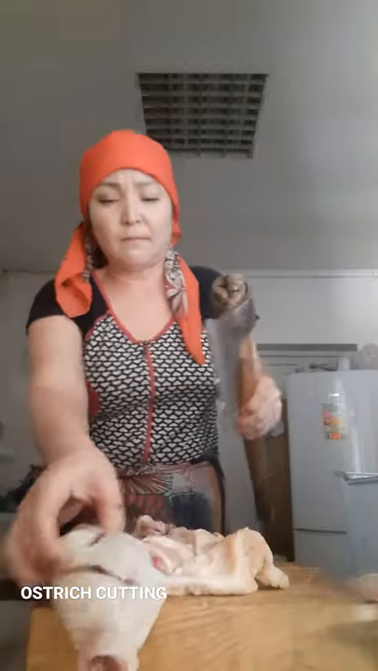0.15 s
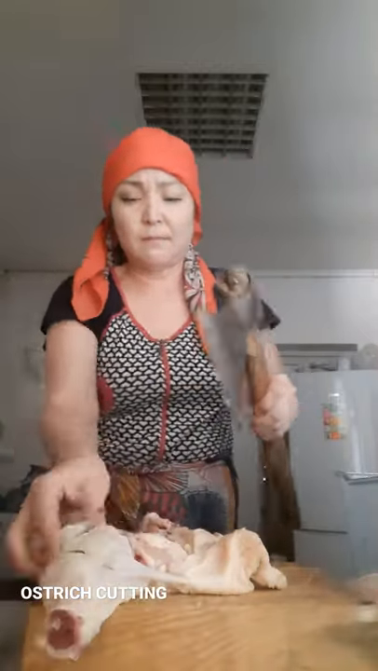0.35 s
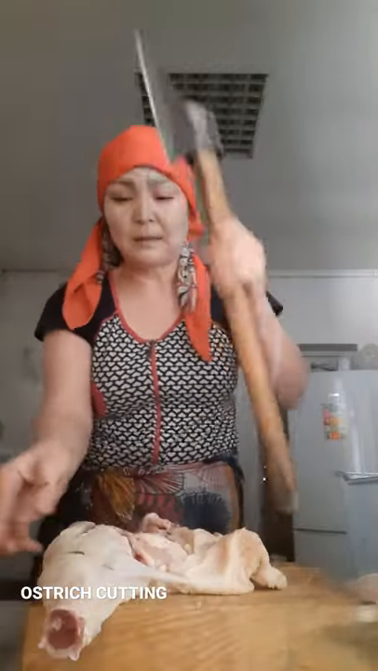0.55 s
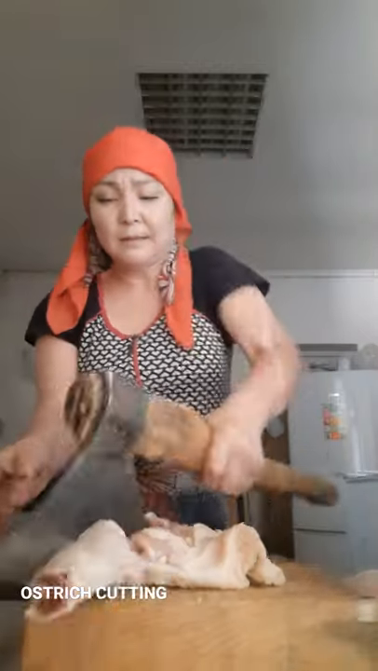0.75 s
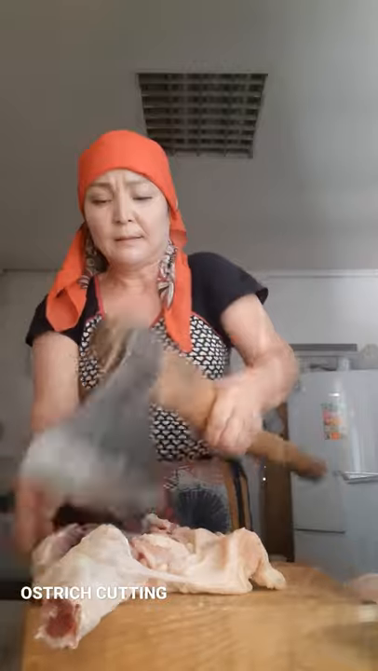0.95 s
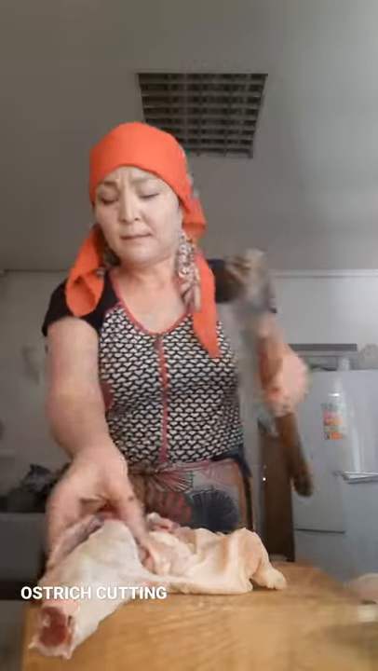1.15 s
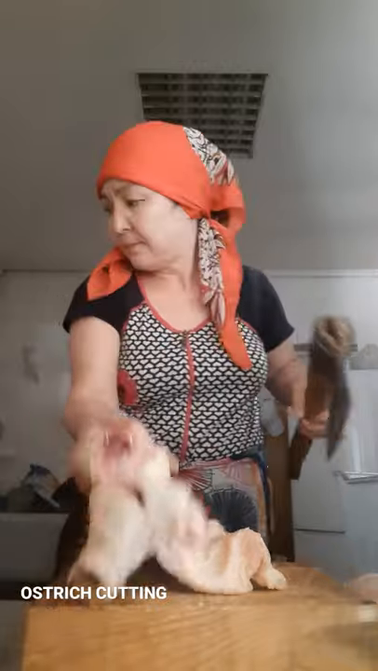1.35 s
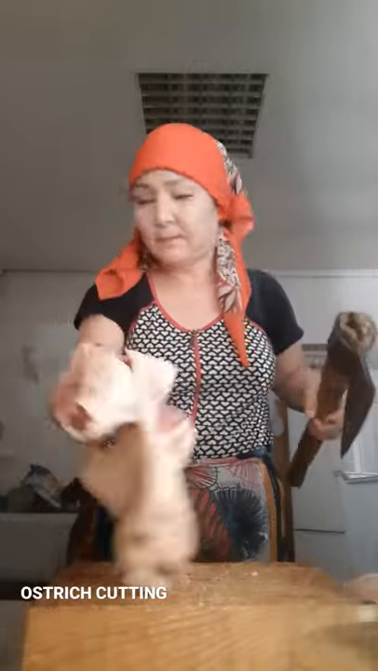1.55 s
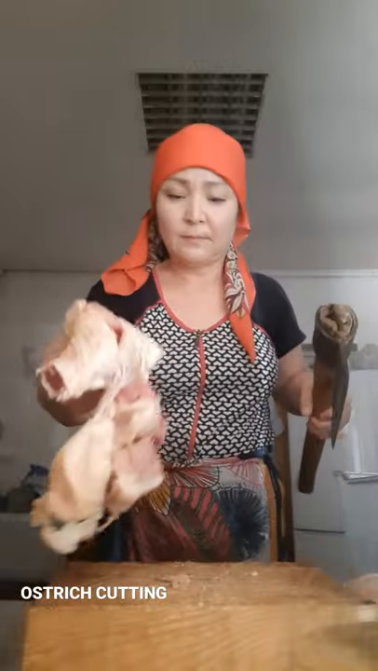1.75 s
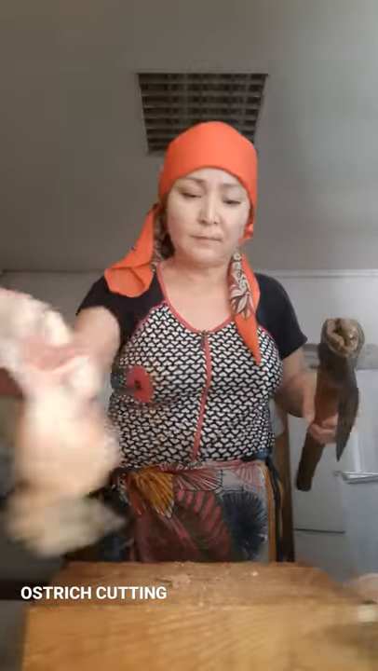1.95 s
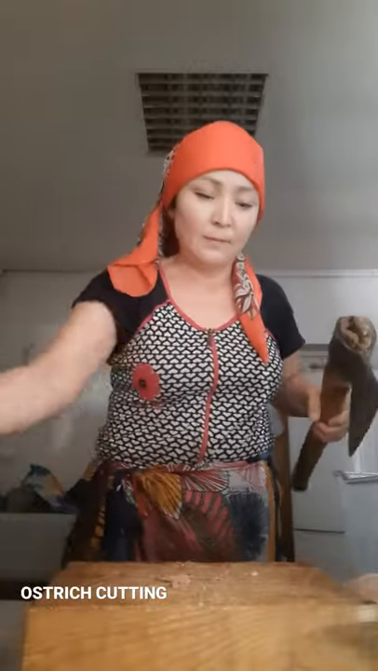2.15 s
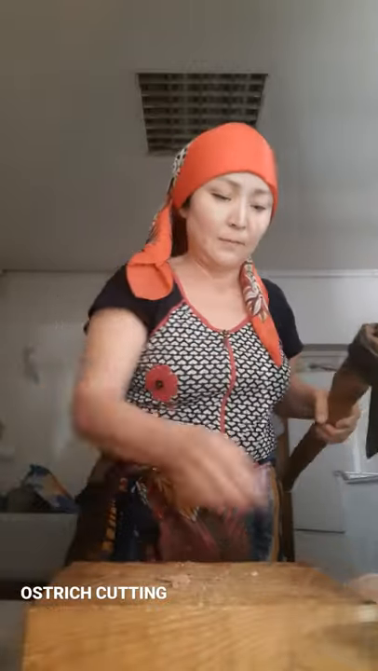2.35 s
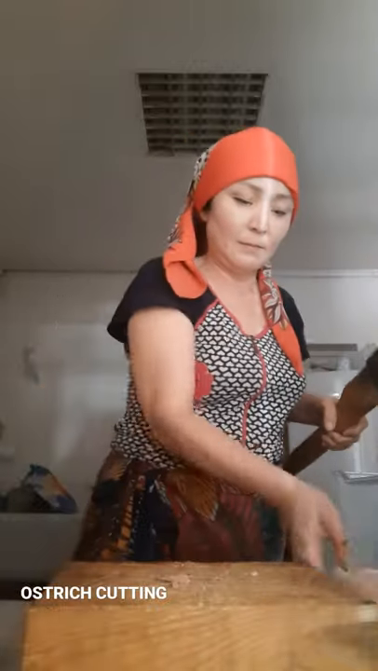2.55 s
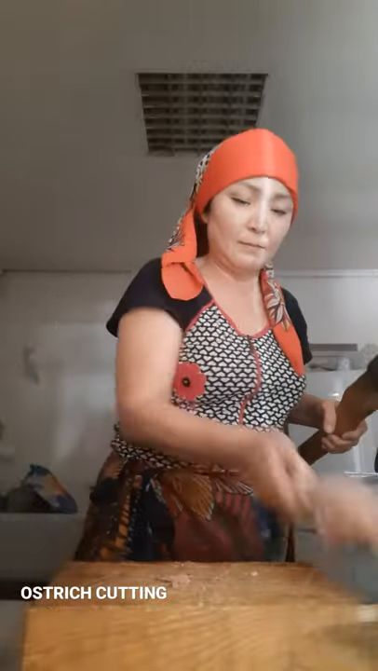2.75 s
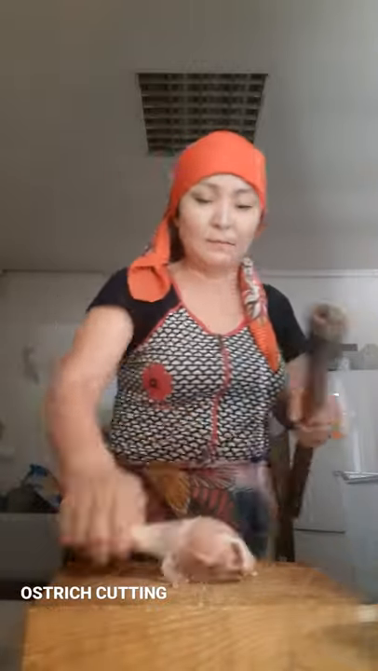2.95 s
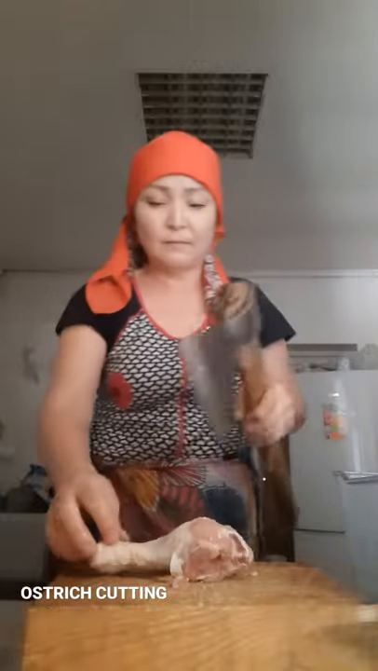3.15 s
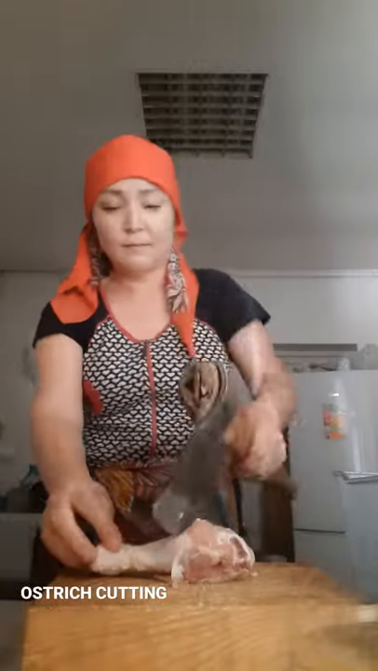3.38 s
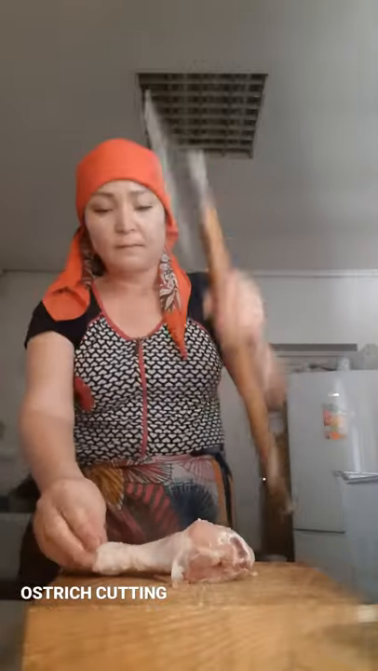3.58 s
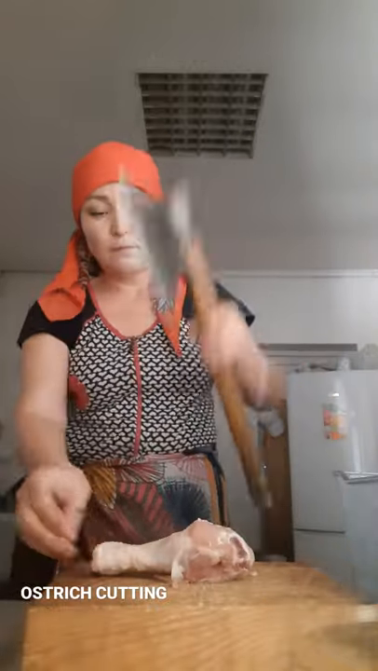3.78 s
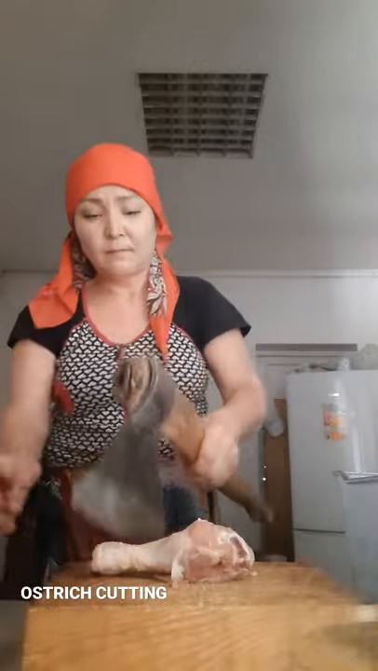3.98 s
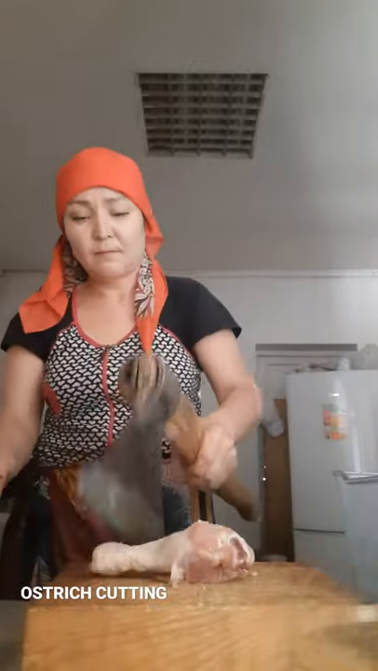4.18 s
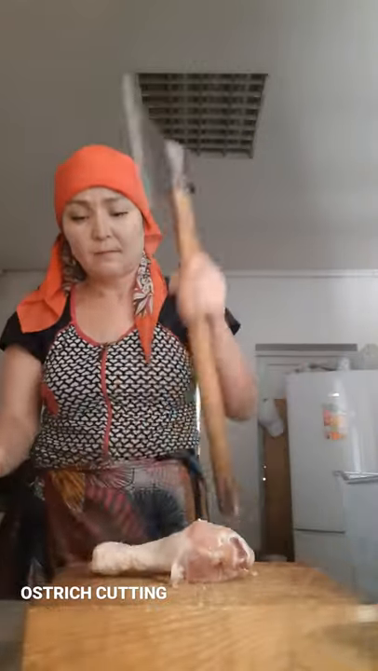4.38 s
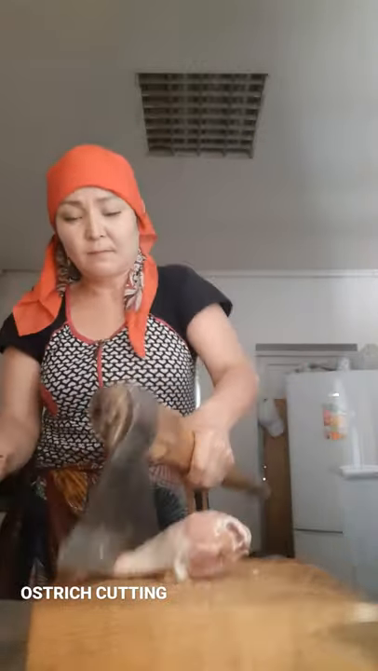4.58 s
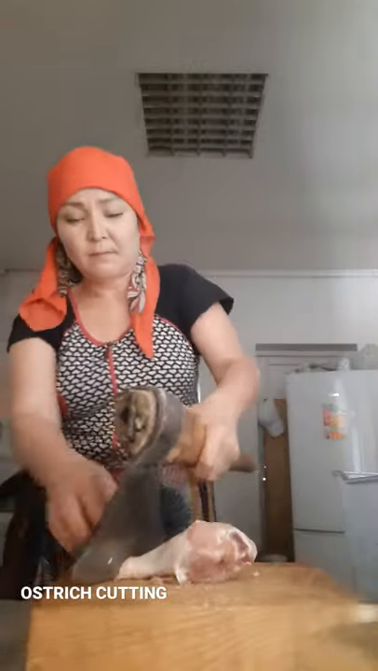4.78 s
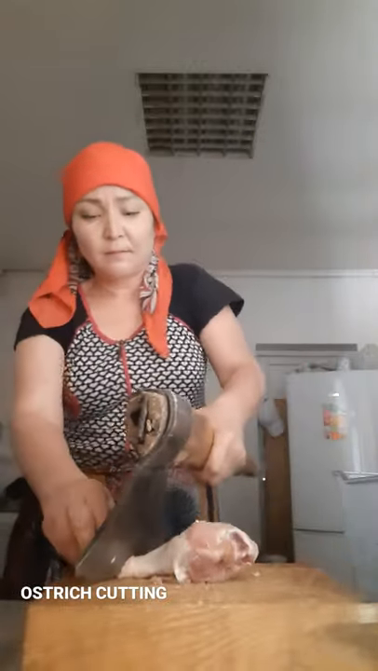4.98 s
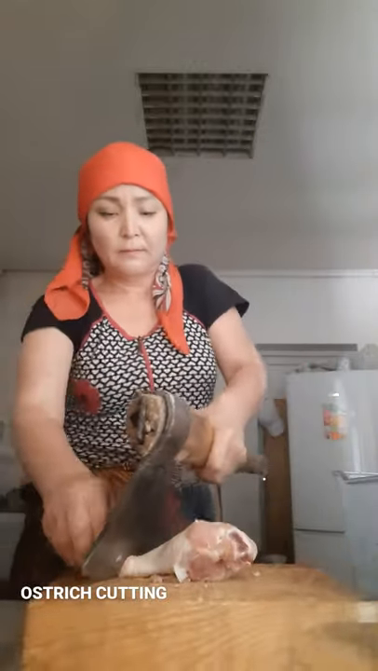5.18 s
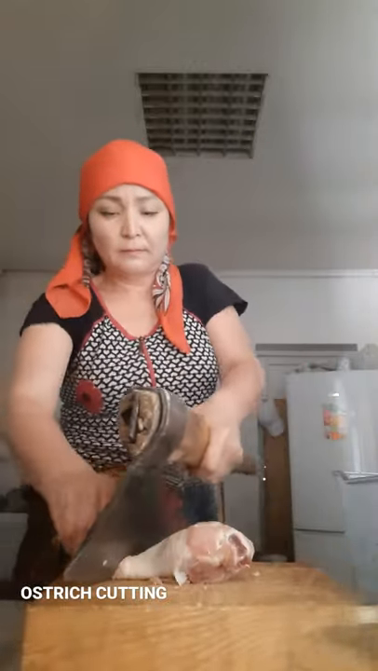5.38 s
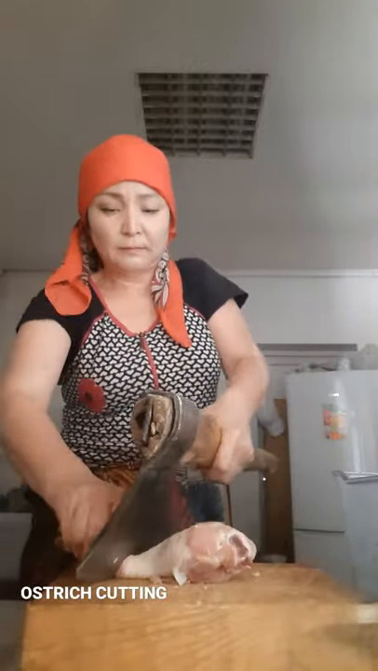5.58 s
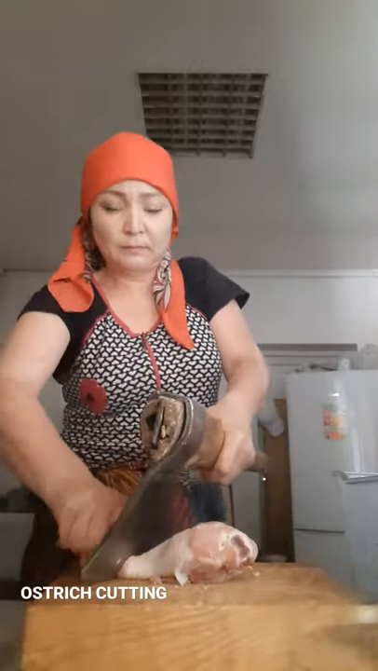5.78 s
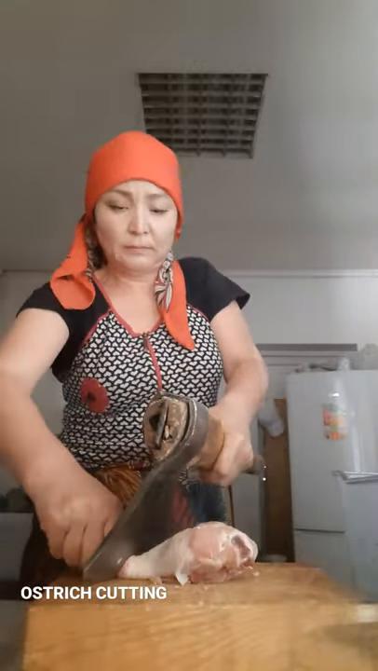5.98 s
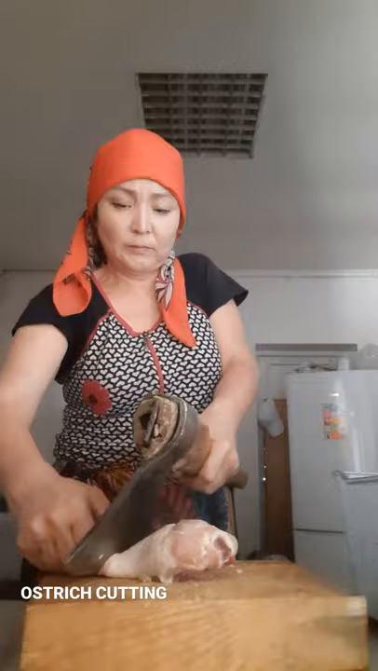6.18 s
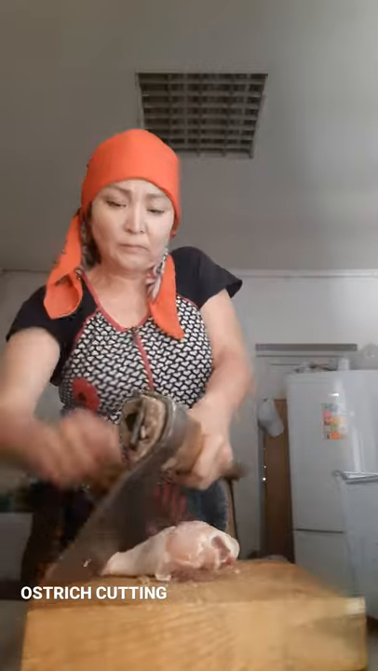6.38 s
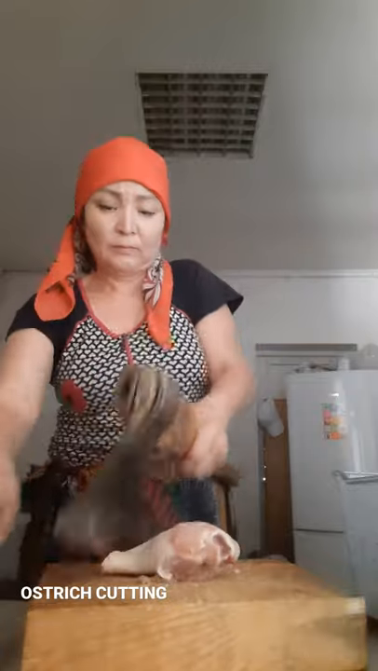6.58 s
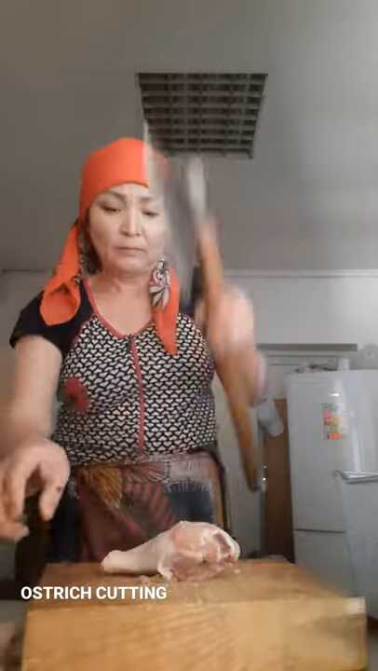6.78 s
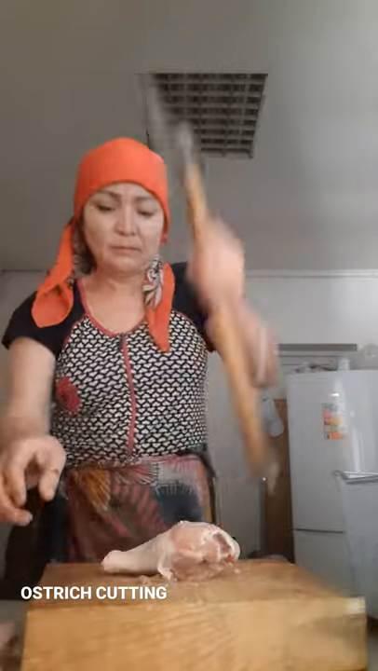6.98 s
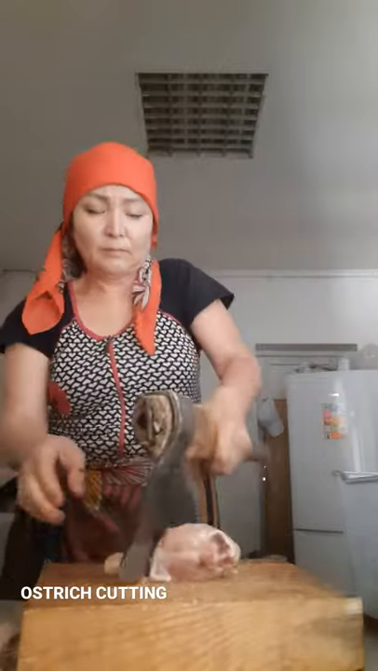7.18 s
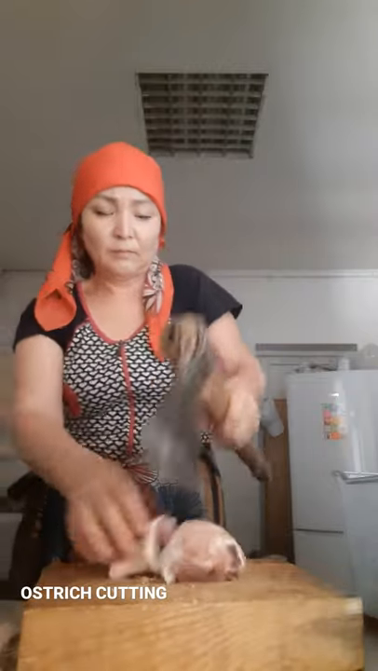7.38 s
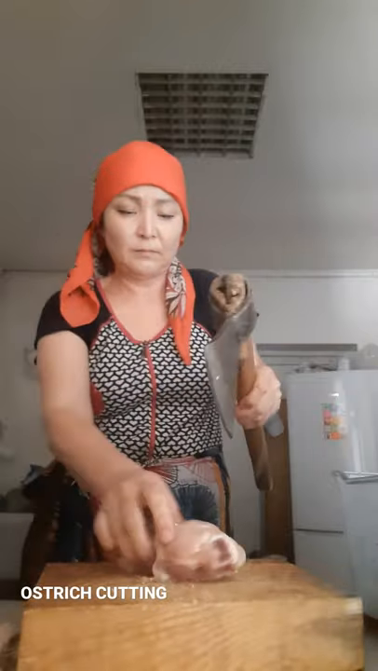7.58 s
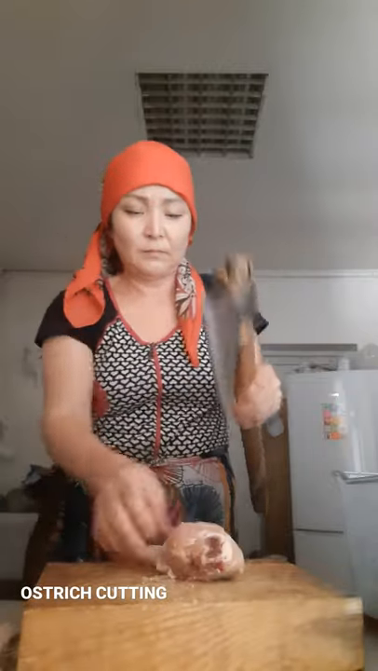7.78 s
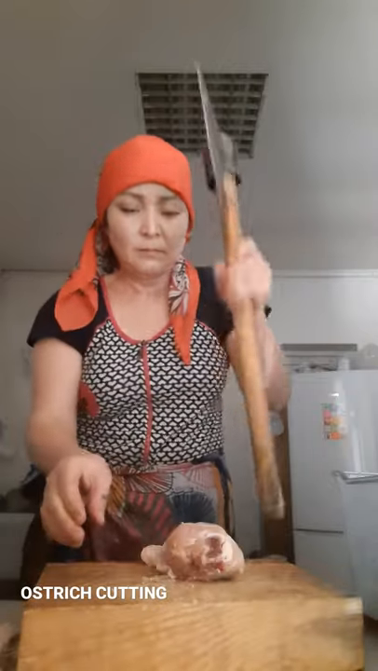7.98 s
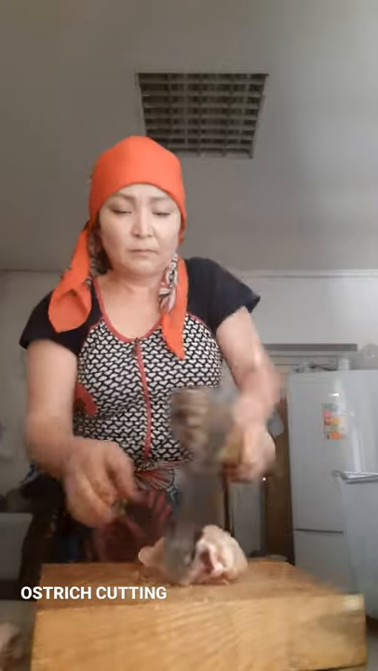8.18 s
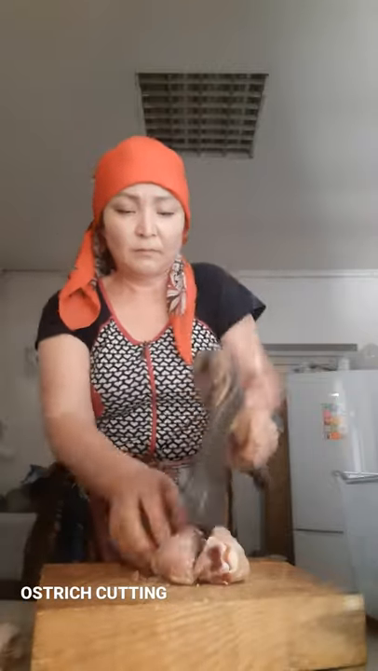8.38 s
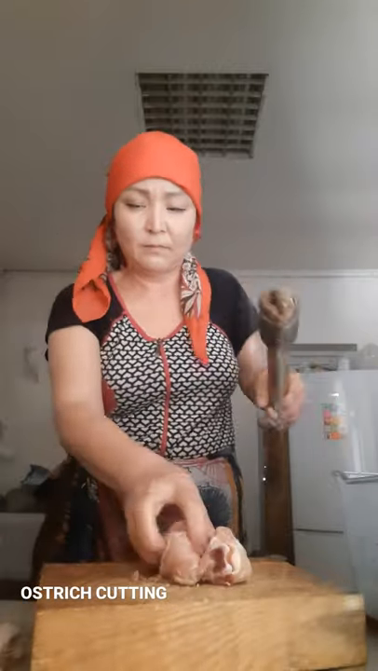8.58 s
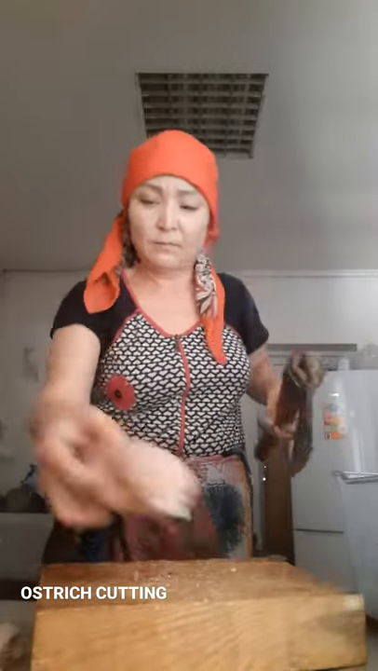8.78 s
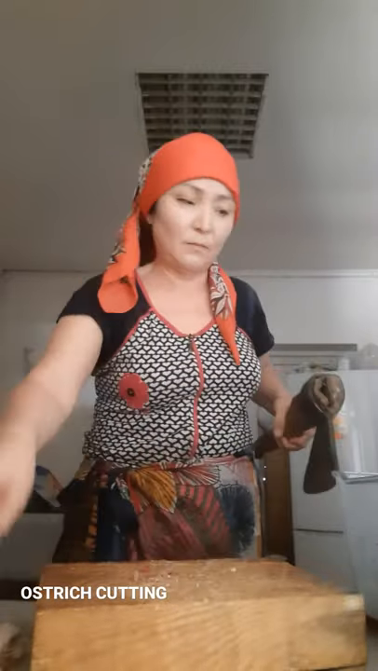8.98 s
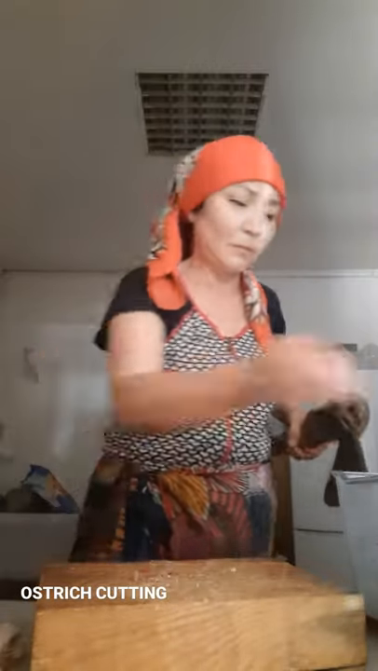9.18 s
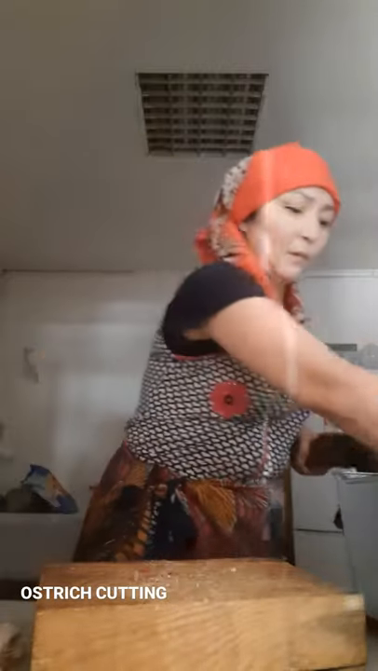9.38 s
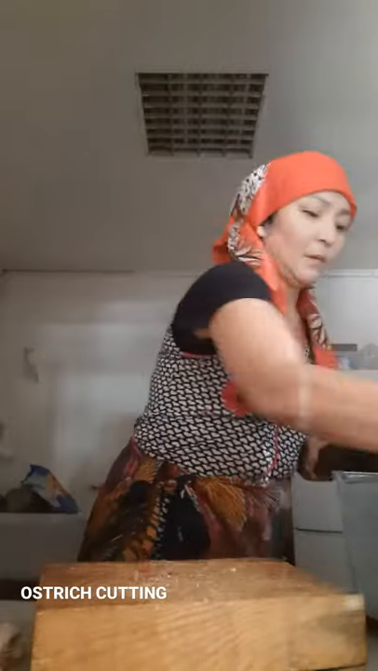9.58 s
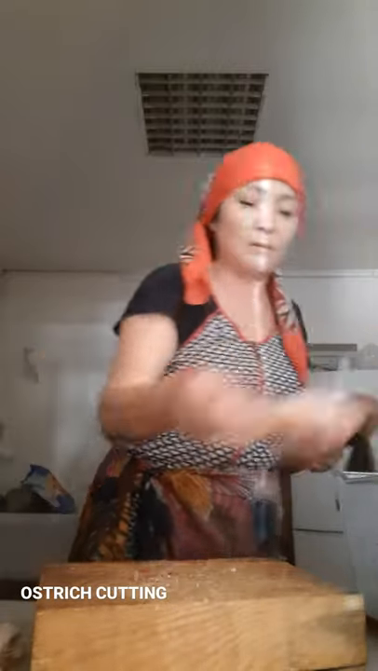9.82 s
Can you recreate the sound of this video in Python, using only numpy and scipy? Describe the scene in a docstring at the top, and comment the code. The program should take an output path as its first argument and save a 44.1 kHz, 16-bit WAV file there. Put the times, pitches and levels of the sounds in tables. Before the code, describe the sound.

Close in a hard-walled kitchen, a heavy blade cracks through bone into a thick wooden block. Meat is dragged and dropped aside, a fresh piece slaps down, and a second blow follows after a long gap. The stuck blade creaks and bone snaps as it is pulled free. Two more chops come about a second apart, each with a wooden boom and short echo. Ventilation hums softly; tiny distant squeaks appear.

```python
"""Cleaver on a chopping block

A heavy cleaver chops raw meat and bone on a thick wooden block in a hard-walled kitchen.
Each of four blows sums a noisy bone crack, a thud pulse, decaying block modes and a rock-back knock.
In between, filtered pulses and grains make meat slaps, drags, snaps and plops; a stuck blade creaks.
Gliding sines squeak faintly from afar over filtered ventilation noise; shaped noise is the reverb."""
import sys
import numpy as np
from scipy import signal
from scipy.fft import rfft, irfft, next_fast_len
from scipy.io import wavfile
from scipy.ndimage import uniform_filter1d

SR = 44100
rng = np.random.default_rng(int(sys.argv[2]) if len(sys.argv) > 2 else 0)


def log_audio(samples):
    """Write samples as a 16-bit WAV file to the path given in sys.argv[1]."""
    # one column per channel
    frames = np.atleast_2d(samples).T
    # limit to full scale, then quantise
    limited = np.clip(frames, -1, 1)
    pcm = np.round(limited * 32767).astype(np.int16)
    wavfile.write(sys.argv[1], SR, pcm)


N = 434385

# background levels: t/s, body level/dB, treble level/dB, gain of the whistling resonances/dB
BACKGROUND_LEVELS = [(0, -57.5, -64.5, -5.5), (.7, -60, -65, -3), (1.5, -59.5, -60, 0.5),
                     (1.7, -61, -64.5, 1.5), (2.9, -58.5, -59.5, 1), (4.4, -58, -62, 3.5),
                     (5.6, -56.5, -59.5, -4.5), (7.0, -59, -59.5, 2.5), (8.3, -60, -60, 0),
                     (9.05, -61, -59.5, 4.5), (9.3, -58, -77, -8), (9.85, -56.5, -66.5, -13.5)]
# ventilation noise spectrum: f/Hz, density/dB per Hz
AIR_SPECTRUM = [(15, -48.5), (25, -24), (49, -1.5), (120, -6.5), (242, -17.5), (344, -4), (384, -6),
                (695, -13.5), (796, -11), (1400, -11.5), (1610, -14), (2350, -10), (4740, -19.5),
                (12200, -20.5), (16000, -32)]
# ventilation resonances: f/Hz, width/Hz, level against the noise of its band/dB
VENT_RESONANCES = [(291.8, 4, -9.5), (346, 11, -13), (388, 70, -23), (652, 18, -14), (1297, 18, -8.5),
                   (1401, 22, -3), (1520, 70, -7), (2270, 55, -11.5), (3950, 130, -11.5)]
WHISTLE_ABOVE_HZ = 1000

# distant squeaks: t/s, length/s, start f/Hz, end f/Hz, arch/share of f, waver/share of f,
# level/dB, first overtone/dB (the second is half the first)
SQUEAKS = [(0.22, 0.2, 1285, 1263, 0.015, 0.0038, -62, -20),
           (0.39, 0.16, 2400, 2280, 0.004, 0.014, -65, -17), (1.175, 0.038, 2300, 2405, 0, 0.037, -56, -9),
           (1.3, 0.083, 1760, 1650, -0.034, 0.036, -63, -20),
           (2.879, 0.046, 3450, 3750, -0.015, .02, -58, -18),
           (3.09, 0.081, 3490, 3980, 0.028, 0.015, -47, -10),
           (3.28, 0.054, 3950, 3710, 0.0047, 0.028, -51, -12),
           (5.969, 0.031, 2816, 2870, 0, 0.014, -53.5, -20),
           (6.081, 0.046, 3230, 3300, -0.02, 0.022, -54, -20),
           (6.503, 0.086, 3760, 3950, 0.0034, 0.014, -50, -20),
           (8.35, 0.17, 2425, 2366, 0.0071, 0.0073, -58.5, -20),
           (8.792, 0.08, 2684, 2405, 0.016, 0.053, -49.5, -18),
           (9.064, 0.069, 3180, 3270, -0.016, 0.025, -52.5, -23),
           (9.112, 0.1, 2693, 2450, 0, 0.061, -48.5, -23),
           (9.368, 0.057, 3000, 3180, 0.013, 0.039, -47, -19),
           (9.44, 0.051, 2600, 2425, -0.0046, 0.058, -42, -15),
           (9.447, 0.028, 4300, 4560, 0.094, 0.03, -49, -20),
           (9.466, 0.026, 4650, 3570, -0.019, 0.025, -42.5, -10),
           (9.499, 0.05, 2450, 2926, 0.065, 0.066, -46, -12),
           (9.684, 0.036, 3100, 2625, -0.0099, 0.095, -43, -13.5),
           (9.717, 0.03, 4000, 4240, 0.032, 0.032, -44.5, -9.5),
           (9.737, 0.018, 4200, 2490, -0.11, 0.067, -43, -11.5),
           (9.756, 0.038, 2650, 2436, -0.018, 0.072, -46.5, -12),
           (9.78, 0.024, 1350, 1530, 0.032, .03, -54, -15)]
RASP_PER_WAVER, RASP_HZ = 4.1, 900   # unsteady squeaks also rasp more

# meat gripped, dragged or peeled off the wood: t/s, length/s, squelch level/dB, rumble level/dB,
# rub level/dB, sticky crackle level/dB
HANDLING = [(0, 0.062, -80, -53.5, -63, -80), (0.118, 0.18, -59.5, -57.5, -72, -57.5),
            (0.276, 0.14, -60.5, -67, -78, -65), (1.368, 0.11, -80, -83, -78, -61),
            (1.573, 0.19, -61.5, -61.5, -68, -76), (1.705, 0.64, -61, -58, -59, -71),
            (2.084, 0.24, -57.5, -53, -68, -49), (2.434, 0.23, -56, -55, -54.5, -58),
            (2.64, 0.087, -60, -62, -53, -68), (2.68, 0.17, -61, -69, -59.5, -58.5),
            (2.76, 0.17, -73, -48, -65, -78), (2.957, 0.29, -56, -56, -65, -66),
            (3.257, 0.17, -72, -48.5, -51, -58), (3.395, 0.45, -78, -61.5, -57, -78),
            (4.185, 0.17, -62, -75, -66, -80), (5.172, 0.093, -57, -60, -54, -74.5),
            (5.241, 0.18, -56.5, -60, -52.5, -75), (5.449, 0.092, -55, -58, -48, -73),
            (5.561, 0.066, -60, -52, -61, -48), (5.9, 0.42, -57, -85, -82, -62),
            (6.258, 0.15, -45, -53, -43, -54), (6.548, 0.19, -52.5, -55, -65, -53.5),
            (8.213, 0.39, -60, -70, -55, -66.5), (8.54, 0.3, -62.5, -83, -67, -67),
            (8.989, 0.11, -64, -50, -55, -56), (9.383, 0.097, -51.5, -47.5, -44.5, -69)]
STROKE_PEAK = 0.55   # share of a stroke spent swelling

# bone splinters and gristle snaps: t/s, level/dB, f/Hz, ring against the snap/dB
SNAPS = [(2.151, -26, 5600, -16), (2.225, -26, 4070, 1), (2.548, -23.5, 12900, -5),
         (5.576, -5.5, 1660, -9.5), (5.582, -10, 2030, -3.5), (5.591, -22, 900, -19),
         (5.693, -38.5, 6900, 13.5), (6.033, -24.5, 6230, -6), (6.612, -21, 2550, -10),
         (9.544, -27.5, 12300, -1), (9.832, -45, 12800, -6)]
# slips of the stuck blade in the bone
CREAK_S, CREAK_GAP_S, CREAK_DB, CREAK_HZ, CREAK_RING_DB = 5.274, 0.016, -39, 2000, 12.5

# meat pieces landing aside: t/s, plop level/dB, wet smack level/dB, hollow f/Hz, hollow ring level/dB
DROPS = [(2.593, -14, -8.5, 407, -9.5), (2.792, -29, -30, 293, -17.5), (3.693, -32, -44, 330, -15),
         (4.08, -30.5, -46, 393, -19.5), (9.406, 1.5, -26, 438, -15), (9.536, -30, -27, 403, -22)]

# meat and blade bumping on the block: t/s, thump level/dB, wet smack level/dB
BUMPS = [(2.19, -29, -26), (2.262, -25, -41), (2.955, -2.5, -9), (2.989, -16, -22), (3.113, -10, -47),
         (3.296, -16, -25), (3.325, -18.5, -30), (3.429, -16, -27), (4.046, -17, -59), (4.838, -17.5, -48),
         (5.235, -19.5, -44), (5.467, -14.5, -34), (5.579, -19, -15), (6.347, -7, -8),
         (6.647, -21.5, -18.5), (7.324, -14.5, -34), (8.421, -24, -35), (9.019, -24.5, -25.5),
         (9.408, -15, -24)]
BUMP_HZ, BUMP_DB_PER_OCTAVE = 560, 26   # hardness of a 0 dB bump, and the level change that doubles it
STAND_HZ = 102.5   # sway of the stand under a bump

# block landing after it tipped: t/s, level/dB, length/s, hardness f/Hz, first touch level/dB,
# dull tail level/dB, block ring level/dB
ROCKS = [(0.867, -1, 0.029, 1130, -8.5, -18, -32), (4.676, 6, 0.013, 1247, -7.5, -14, -17),
         (7.179, 6.5, 0.012, 2640, -1, -9, -22.5), (8.191, 5.5, 0.02, 1780, -6, -10, -21.5)]
TOUCH_BEFORE_S, TOUCH_S, TOUCH_HZ = 0.072, 0.0078, 710   # dull first touch
DULL_TAIL_AFTER_S, DULL_TAIL_S, DULL_TAIL_HZ = 0.073, 0.23, 1370   # noise following the landing
DULL_TAIL_FLUTTER_DB, DULL_TAIL_FLUTTER_PER_S = 2.5, 32.1
LANDING_TICK_DB, LANDING_TICK_S = -2, 0.0011   # block edge strike; level against the knock
# block response to a landing: f/Hz, gain/dB
LANDING_ANSWER = [(100, -16.5), (135, -9.5), (160, -8), (295, -4.5), (335, 6), (400, 4), (490, -2),
                  (800, -5)]

# blows: t/s, crack level/dB, crack length/s, delay to the wood/s, thud level before THUD_GAIN_DB/dB,
# hardness f/Hz, bone f/Hz, bone ring against the crack/dB, sway/dB, boom/dB, block ring/dB
CHOPS = [(0.756, 13, 0.0085, 0.0084, 14, 1524, 2710, -3.5, -13, -21.5, -15),
         (4.5766, 14, 0.0075, 0.0043, 13.5, 2497, 959, -2, -9, -12, -9),
         (7.0712, 11.5, 0.0062, .0043, 16.5, 1646, 1010, 2, -13.5, -9.5, -20.5),
         (8.0998, 9, 0.0075, 0.0077, 11.5, 802, 856, -10.5, -11.5, -10, -21)]
THUD_GAIN_DB = 3.0
SWAY_HZ, BOOM_HZ, RING_HZ = 100, 146, 290   # where the last three columns of CHOPS apply
# stand bottoming out under a blow: t/s, level/dB, hardness f/Hz
JOLTS = [(0.782, 7, 420), (4.602, 9, 330), (7.121, 7, 520), (8.135, 8, 260)]
# modes of block and stand: nominal f/Hz, level/dB, t60/s
BLOCK_MODES = [(66, -15.5, 0.053), (99, -1, 0.25), (124, -2.5, 0.24), (135.5, -1, 0.2), (157.7, 2, 0.28),
               (219.6, -9.5, 0.2), (301.3, 3.5, 0.19), (331.5, -3.5, 0.16), (399, -8.5, 0.12),
               (494, -6, 0.24), (652, -15, 0.27), (806, -20, 0.17)]
DETUNE = 0.02   # meat loads the block differently at every strike: mode spread, share of f
# thin high ringing after each blow: f/Hz, level/dB, t60/s
HIGH_RING_MODES = [(1588, -38.5, 0.42), (1970, -36.5, 0.41), (2144, -38, 0.42), (2450, -40.5, 0.57),
                   (2740, -45, 0.22), (3180, -41, .3), (6900, -45.5, 0.36)]

# blade edge on the wood: f/Hz, density/dB per Hz
THUD_SPECTRUM = [(25, -26), (45, -7.5), (65, -0.5), (110, -9), (220, -3.5), (380, -0.5), (600, -4),
                 (1050, -7.5), (1700, -4.5), (3000, -18.5), (7000, -16.5), (16000, -35)]
# splitting bone, also peeling skin: f/Hz, density/dB per Hz
CRACK_SPECTRUM = [(60, -10.5), (400, -2), (1400, -4), (2800, -1), (4500, -4.5), (6700, -3.5), (9500, -12.5),
                  (13500, -5.5), (16000, -15.5)]
# block landing on its stand: f/Hz, density/dB per Hz
KNOCK_SPECTRUM = [(40, -13), (150, -4), (400, -9), (800, -5.5), (1700, -9), (2700, -8), (4000, -11.5),
                  (7000, -11.5), (15000, -7.5)]
# weight of meat: f/Hz, density/dB per Hz
THUMP_SPECTRUM = [(25, -10.5), (70, 3.5), (150, 6.5), (230, -8.5), (400, -5.5), (800, -20), (2000, -13.5),
                  (16000, -29)]
# hollow container: f/Hz, density/dB per Hz
PLOP_SPECTRUM = [(40, -73), (150, 0.5), (250, -7.5), (380, 8.5), (550, -2), (750, 3), (1100, -21),
                 (1500, -16.5), (4000, -21), (16000, -87)]
# wet skin: f/Hz, density/dB per Hz
SMACK_SPECTRUM = [(100, -21), (600, -7.5), (1800, 1.5), (3500, 1.5), (6500, -2.5), (10000, -12.5),
                  (13000, -7), (16000, -21)]
# small break: f/Hz, density/dB per Hz
SNAP_SPECTRUM = [(150, -4), (700, -11), (1800, -4.5), (3500, -7), (6500, -8), (10000, -7.5), (13500, 0),
                 (16000, -11)]
# flesh sliding on wood: f/Hz, density/dB per Hz
RUB_SPECTRUM = [(100, -17), (350, 2), (800, -6.5), (1300, -9), (2200, -5), (4000, -21), (16000, -38)]
# block under shifting weight: f/Hz, density/dB per Hz
RUMBLE_SPECTRUM = [(20, -5), (55, 1), (130, -6), (220, -22), (350, -6), (700, -27), (2000, -43),
                   (16000, -61)]

# reverberation: f/Hz, gain before the standing waves/dB
ROOM_GAIN = [(30, 2.5), (70, -4.5), (170, -1.5), (350, 3), (700, 0), (1400, -7.5), (2800, -5.5),
             (6000, -10.5), (10000, -8.5), (15000, -7.5)]
# decay: f/Hz, t60/s
ROOM_T60 = [(60, 0.33), (250, 0.32), (700, 0.34), (1500, 0.46), (3000, 0.26), (7000, 0.34), (14000, 0.06)]
# left-right correlation of diffuse sound: f/Hz, correlation/1
LIKENESS = [(30, 0.98), (180, 0.94), (350, .93), (700, .6), (1400, -0.35), (3000, 0.32), (16000, -0.49)]
# standing waves between the walls: f/Hz, width/Hz, gain/dB
STANDING_WAVES = [(298, 20, 5), (483, 25, 4), (657, 33, 4.5), (840, 22, 1), (1010, 66, 4), (1590, 190, 1.5)]
DIP_DB, DIP_WAIT_S, DIP_FALL_S, DIP_HOLD_S, DIP_RETURN_S = -7.5, 0.095, 0.25, 0.46, 0.32

# colour of the two microphone ports: f/Hz, left minus right/dB
PORTS = [(250, -0.5), (700, -1.5), (1400, 0.5), (2800, 2), (5600, -3), (9500, 3), (13000, 0), (16000, -12)]
MIC_LAG_S, CUTOFF_HZ = 0.0001, 16300


def from_db(db):
    """Decibels to gain."""
    return 10 ** (np.asarray(db) / 20)


def rms_one(x):
    """Scale to unit power."""
    return x / np.sqrt(np.mean(x ** 2) + 1e-20)


def energy_one(x):
    """Scale to unit energy."""
    return x / np.sqrt(np.sum(x ** 2) + 1e-20)


def in_time(rows):
    """Interpolate the columns of a time table at every sample."""
    time_s, *columns = np.transpose(rows)
    return [np.interp(np.arange(N) / SR, time_s, column) for column in columns]


def at_hz(points, hz):
    """Read a table on a log-frequency axis."""
    f, value = np.transpose(points)
    return np.interp(np.log(np.maximum(hz, 1)), np.log(f), value)


def add(track, time_s, sound):
    """Mix a sound into a track."""
    i = int(time_s * SR)
    track[i:i + len(sound)] += sound[:N - i]


def cut(x, hz, kind, order=2):
    """Butterworth filter."""
    sos = signal.butter(order, np.clip(hz, 10, .45 * SR), kind, fs=SR, output="sos")
    return signal.sosfilt(sos, x)


def resonance(x, hz, width_hz):
    """Two-pole band-pass."""
    r = np.exp(-np.pi * width_hz / SR)
    return signal.lfilter([1 - r, 0, r - 1], [1, -2 * r * np.cos(2 * np.pi * hz / SR), r * r], x)


def drift(per_s):
    """Slow chance: straight lines between normal random knots of unit spread."""
    knots = rng.standard_normal(400)
    return np.interp(np.arange(N) / SR * per_s, np.arange(len(knots)), knots)


def pulse(spectrum, size=4096):
    """Minimum-phase pulse, the most compact causal one with this spectrum; unit energy."""
    cepstrum = irfft(np.log(from_db(at_hz(spectrum, np.fft.rfftfreq(size, 1 / SR)))))
    # fold the cepstrum onto positive time
    cepstrum[1:size // 2] *= 2
    cepstrum[size // 2 + 1:] = 0
    return energy_one(irfft(np.exp(rfft(cepstrum))))


def contact(spectrum, hardness_hz):
    """A blow: the softer the contact, the duller its pulse; unit energy."""
    return energy_one(cut(pulse(spectrum), hardness_hz, "low"))


def fracture(spectrum, length_s, spread_db=2, steepness=4, size=4096):
    """Run of tiny uneven contacts that stops short (steep) or trails off; unit energy."""
    t = np.arange(size) / SR
    breaks = rng.standard_normal(size) * from_db(spread_db * rng.standard_normal(size))
    fading = breaks * np.exp(-(t / length_s) ** steepness)
    return energy_one(signal.fftconvolve(fading, pulse(spectrum))[:size])


def block_ring(answer, build_s):
    """Block modes swell and die away, slightly retuned at every strike."""
    t = np.arange(SR // 2) / SR
    phases = rng.random(len(BLOCK_MODES))
    shifts = rng.standard_normal(len(BLOCK_MODES))
    out = np.zeros(len(t))
    for (hz, db, t60_s), phase, shift in zip(BLOCK_MODES, phases, shifts):
        tone = np.sin(2 * np.pi * (hz * (1 + DETUNE * shift) * t + phase))
        out += tone * from_db(at_hz(answer, hz) + db - 60 * t / t60_s)
    return out * (1 - np.exp(-t / build_s))


def diffuse(spectrum, size):
    """Stereo noise from all sides; LIKENESS sets the channel correlation by frequency."""
    length = next_fast_len(size, True)
    hz = np.fft.rfftfreq(length, 1 / SR)
    mid, side = rfft(rng.standard_normal((2, length)))
    alike = np.clip(at_hz(LIKENESS, hz), -1, 1)
    both = np.sqrt((1 + alike) / 2) * mid + np.sqrt((1 - alike) / 2) * side * [[1], [-1]]
    return irfft(both * from_db(at_hz(spectrum, hz)), length)[:, :size]


def kitchen(x, first_echo_s=0.0024, build_up_s=0.0011, last_echo_s=0.5, smooth_bins=25):
    """Dense reflections build up, coloured by standing waves; each band decays at its own rate."""
    t = np.arange(SR) / SR
    hz = np.fft.rfftfreq(SR, 1 / SR)
    edges_hz = np.geomspace(30, 17000, 17)
    noises = [diffuse([(1, 0)], SR) for _ in range(2)]
    tail = np.zeros((2, SR))
    for k, (low_hz, high_hz) in enumerate(zip(edges_hz, edges_hz[1:])):
        t60_s = at_hz(ROOM_T60, np.sqrt(low_hz * high_hz))
        # neighbouring bands use unrelated noise
        tail += cut(noises[k % 2], [low_hz, high_hz], "band") * from_db(-60 * t / t60_s)
    tail = rfft(tail)
    colour_db = at_hz(ROOM_GAIN, hz)
    for f, width_hz, db in STANDING_WAVES:
        colour_db = colour_db + db * np.exp(-((hz - f) / width_hz) ** 2)
    # flatten the tail before colouring it
    even = tail / np.sqrt(uniform_filter1d(np.mean(np.abs(tail) ** 2, axis=0), smooth_bins) + 1e-6)
    swell = (1 - np.exp(-np.maximum(t - first_echo_s, 0) / build_up_s)) * (t < last_echo_s)
    response = irfft(even * from_db(colour_db), SR) * swell
    return signal.oaconvolve(x[None], response, axes=1)[:, :N]


def changing_kitchen(x):
    """The cook moves between blows, so each blow meets another pattern of reflections."""
    stretch = np.searchsorted([row[0] + .5 for row in CHOPS], np.arange(N) / SR)
    return sum(kitchen(x * (stretch == k)) for k in np.unique(stretch))


def dip_after_blows(x, spared_hz=300):
    """Above the bass, the level sinks after every blow, stays low and returns."""
    corners_s = np.cumsum([DIP_WAIT_S, DIP_FALL_S, DIP_HOLD_S, DIP_RETURN_S])
    depth = [np.interp(np.arange(N) / SR - row[0], corners_s, [0, 1, 1, 0]) for row in CHOPS]
    bass = cut(x, spared_hz, "low", order=1)
    return bass + from_db(DIP_DB * np.max(depth, axis=0)) * (x - bass)


def microphones(x, scatter_db=-2, scatter_hz=3500):
    """Direct sound reaches the right port first; for the left, treble scatters round the case."""
    burst = SR // 400   # 2.5 ms
    scatter = cut(np.pad(energy_one(rng.standard_normal(burst)), (0, burst)), scatter_hz, "high")
    scattered = from_db(scatter_db) * signal.oaconvolve(x, scatter)[:N]
    left = cut(x, scatter_hz, "low", order=1) + scattered
    return np.array([np.pad(left, (round(MIC_LAG_S * SR), 0))[:N], x])


def background(split_hz=3200, low_cut_hz=45, waver_db=2, waver_per_s=6, wander=0.0076, wander_per_s=4):
    """Ventilation noise with resonances wavering in level and pitch, and a separate hiss on top."""
    level_db, treble_db, whistle_db = in_time(BACKGROUND_LEVELS)
    air = cut(diffuse(AIR_SPECTRUM, N), low_cut_hz, "high")
    body = rms_one(cut(air, split_hz, "low"))
    hiss = rms_one(cut(diffuse(AIR_SPECTRUM, N), split_hz, "high"))
    n = np.arange(N)
    for hz, width_hz, db in VENT_RESONANCES:
        # an uneven time axis wanders the pitch
        warped = n + np.cumsum(wander * drift(wander_per_s))
        tone = np.array([np.interp(warped, n, side) for side in resonance(air, hz, width_hz)])
        tone = tone * (warped > 0) * (warped < N)
        gain = from_db(db + whistle_db * (hz > WHISTLE_ABOVE_HZ))
        hum = gain * rms_one(tone * from_db(waver_db * drift(waver_per_s)))
        if hz < split_hz:
            body = body + hum
        else:
            hiss = hiss + hum
    return from_db(level_db) * rms_one(body) + from_db(treble_db) * hiss


def squeaks(waver_hz=330):
    """Wavering, rasping chirps that arch and glide, each with two overtones."""
    out = np.zeros(N)
    for time_s, length_s, start_hz, end_hz, arch, waver, db, overtone_db in SQUEAKS:
        size = int(length_s * SR)
        bow = np.sin(np.linspace(0, np.pi, size))
        wobble = rms_one(cut(rng.standard_normal(SR), waver_hz, "low"))[:size]
        rasp = rms_one(cut(rng.standard_normal(SR), RASP_HZ, "low"))[:size]
        pitch_hz = np.linspace(start_hz, end_hz, size) * (1 + arch * bow + waver * wobble)
        phase = 2 * np.pi * np.cumsum(pitch_hz) / SR
        overtones = np.sin(2 * phase) + .5 * np.sin(3 * phase)
        tone = np.sin(phase) + from_db(overtone_db) * overtones
        add(out, time_s, from_db(db) * bow * (1 + RASP_PER_WAVER * waver * rasp) * tone)
    return out


def grains(per_s, spread_db, spectrum):
    """Random clicks of uneven size at a mean rate; unit power."""
    hits = rng.random(N) < per_s / SR
    clicks = hits * rng.standard_normal(N) * from_db(spread_db * rng.standard_normal(N))
    return rms_one(signal.oaconvolve(clicks, pulse(spectrum))[:N])


def handling(squelch_per_s=3000, judder_db=3, judder_per_s=38, crackle_per_s=450, crackle_spread_db=3):
    """Strokes swell and fade: flesh squelches, skin peels in clicks, flesh rubs, the block rumbles."""
    wet, weight, slide, peel = np.zeros((4, N))
    for time_s, length_s, *levels_db in HANDLING:
        stroke = np.interp(np.linspace(0, 1, int(length_s * SR)), [0, STROKE_PEAK, 1], [0, 1, 0])
        for track, db in zip((wet, weight, slide, peel), levels_db):
            add(track, time_s, from_db(db) * stroke)
    squelch = grains(squelch_per_s, 0, SMACK_SPECTRUM)
    crackle = grains(crackle_per_s, crackle_spread_db, CRACK_SPECTRUM)
    friction = rng.standard_normal(N) * from_db(judder_db * drift(judder_per_s))
    rub = rms_one(signal.oaconvolve(friction, pulse(RUB_SPECTRUM))[:N])
    rumble = rms_one(cut(diffuse(RUMBLE_SPECTRUM, N), 21, "high"))
    return wet * squelch + peel * crackle + slide * rub, weight * rumble


def creak(count=3):
    """Evenly spaced slips of the stuck blade, each a small snap."""
    return [(CREAK_S + k * CREAK_GAP_S, CREAK_DB, CREAK_HZ, CREAK_RING_DB) for k in range(count)]


def snaps(snap_s=0.00114, width_hz=250):
    """Short breaks, each exciting a brief ring."""
    out = np.zeros(N)
    for time_s, db, hz, ring_db in SNAPS + creak():
        snap = fracture(SNAP_SPECTRUM, snap_s)
        ring = energy_one(resonance(snap, hz, width_hz))
        add(out, time_s, from_db(db) * (snap + from_db(ring_db) * ring))
    return out


def drops(smack_s=0.0088, settle_s=0.026, width_hz=35):
    """Soft pieces settle in a hollow container with a plop, a hollow ring and a wet smack."""
    out = np.zeros(N)
    for time_s, db, smack_db, hz, ring_db in DROPS:
        ring = energy_one(resonance(pulse(PLOP_SPECTRUM), hz, width_hz))
        add(out, time_s, from_db(db) * fracture(PLOP_SPECTRUM, settle_s))
        add(out, time_s, from_db(ring_db) * ring)
        add(out, time_s, from_db(smack_db) * fracture(SMACK_SPECTRUM, smack_s))
    return out


def bumps(give_s=0.004, sway_width_hz=60, sway_db=-2):
    """Wet skin smacks, then the weight arrives and the block sways; weak bumps are softer, longer."""
    out = np.zeros(N)
    for time_s, db, smack_db in BUMPS:
        hardness_hz = BUMP_HZ * 2 ** (db / BUMP_DB_PER_OCTAVE)
        smack = fracture(SMACK_SPECTRUM, 2.4 / hardness_hz, spread_db=4, steepness=0.88)
        push = contact(THUMP_SPECTRUM, hardness_hz)
        sway = resonance(resonance(push, STAND_HZ, sway_width_hz), STAND_HZ, sway_width_hz)
        thump = energy_one(push + from_db(sway_db) * energy_one(sway))
        add(out, time_s, from_db(smack_db) * smack)
        add(out, time_s + give_s, from_db(db) * thump)   # the flesh gives first
    return out


def knock(length_s, hardness_hz, steepness=4):
    """A run of knocking contacts, the softer the duller; unit energy."""
    run = fracture(KNOCK_SPECTRUM, length_s, steepness=steepness, size=16384)
    return energy_one(cut(run, hardness_hz, "low"))


def rocking(tail_cut_hz=1900, trail=1.4, ring_build_s=0.004):
    """The tipped block touches down, lands with a knock and rings; a dull, uneven noise tail follows."""
    out, ring = np.zeros((2, N))
    for time_s, db, length_s, hardness_hz, touch_db, tail_db, ring_db in ROCKS:
        add(out, time_s - TOUCH_BEFORE_S, from_db(touch_db) * knock(TOUCH_S, TOUCH_HZ))
        add(out, time_s, from_db(db) * knock(length_s, hardness_hz, trail))
        add(out, time_s, from_db(db + LANDING_TICK_DB) * knock(LANDING_TICK_S, hardness_hz))
        add(ring, time_s, from_db(ring_db) * block_ring(LANDING_ANSWER, ring_build_s))
        tail = cut(knock(DULL_TAIL_S, DULL_TAIL_HZ), tail_cut_hz, "low", order=8)   # no treble
        flutter_db = DULL_TAIL_FLUTTER_DB * drift(DULL_TAIL_FLUTTER_PER_S)[:len(tail)]
        tail = energy_one(tail * from_db(flutter_db))
        add(out, time_s + DULL_TAIL_AFTER_S, from_db(tail_db) * tail)
    return out, ring


def flesh_push_and_high_ring(push_hz=130, push_db=-3):
    """Flesh squashed under the edge gives a soft low push; high tones ring briefly."""
    out = np.zeros(N)
    t = np.arange(SR // 2) / SR
    for time_s, crack_db, *_ in CHOPS:
        add(out, time_s, from_db(crack_db + push_db) * contact(THUMP_SPECTRUM, push_hz))
        for hz, db, t60_s in HIGH_RING_MODES:
            add(out, time_s, from_db(db - 60 * t / t60_s) * np.sin(2 * np.pi * hz * t))
    return out


def chops(bite_after_s=0.00567, bite_db=-4, bite_s=0.0014, ring_build_s=0.0043,
          lead_in_before_s=0.0035, lead_in_db=-21, bone_width_hz=90):
    """A faint noisy lead-in, then the crack of ringing bone; the edge bites wood, block booms, stand jolts."""
    crack, crack_all_round, thud, boom = np.zeros((4, N))
    for (time_s, crack_db, length_s, delay_s, thud_db, hardness_hz,
         bone_hz, bone_db, sway_db, boom_db, ring_db) in CHOPS:
        middle_s, wood_s = time_s + length_s / 2, time_s + delay_s
        lead_in = fracture(CRACK_SPECTRUM, length_s)
        add(crack, time_s - lead_in_before_s, from_db(crack_db + lead_in_db) * lead_in)
        add(crack, time_s, from_db(crack_db) * fracture(CRACK_SPECTRUM, length_s))
        bone = energy_one(resonance(pulse(CRACK_SPECTRUM), bone_hz, bone_width_hz))
        add(crack, middle_s, from_db(crack_db + bone_db) * bone)
        # summed over all directions, the many breaks have an even spectrum
        add(crack_all_round, middle_s, from_db(crack_db) * pulse(CRACK_SPECTRUM))
        add(thud, wood_s, -from_db(thud_db + THUD_GAIN_DB) * contact(THUD_SPECTRUM, hardness_hz))
        bite = energy_one(cut(fracture(THUD_SPECTRUM, bite_s), hardness_hz, "low"))
        add(thud, wood_s + bite_after_s, from_db(thud_db + bite_db) * bite)
        # where the edge lands decides how strongly the block answers
        answer = [(SWAY_HZ, sway_db), (BOOM_HZ, boom_db), (RING_HZ, ring_db)]
        add(boom, wood_s, block_ring(answer, ring_build_s))
    for time_s, db, hardness_hz in JOLTS:
        add(thud, time_s, from_db(db) * contact(THUD_SPECTRUM, hardness_hz))
    return crack, crack_all_round, thud, boom


def scene():
    """Each source has its own share of direct sound and of the room."""
    air = background()
    squeak = squeaks()
    squelch, rumble = handling()
    snap, drop, bump = snaps(), drops(), bumps()
    rock, rock_ring = rocking()
    crack, crack_all_round, thud, boom = chops()
    direct = squeak + squelch + snap + from_db(-3.5) * drop + bump
    direct += from_db(-2.0) * rock + rock_ring
    direct += flesh_push_and_high_ring() + crack + thud + boom
    to_room = from_db(5.5) * squeak + from_db(-3.5) * (snap + squelch)
    to_room += from_db(-7.0) * drop + from_db(-2.0) * bump
    to_room += from_db(-4.5) * rock + crack_all_round + thud
    return microphones(direct) + rumble + dip_after_blows(changing_kitchen(to_room) + air)


def record(dry, ceiling=0.65):
    """Each port has its own colour; peaks are rounded and the top is cut."""
    length = next_fast_len(N, True)
    lean_db = at_hz(PORTS, np.fft.rfftfreq(length, 1 / SR))
    ports = irfft(rfft(dry, length) * from_db(lean_db * [[.5], [-.5]]), length)[:, :N]
    rounded = ceiling * np.tanh(cut(ports, 18, "high") / ceiling)
    return signal.sosfilt(signal.ellip(10, .2, 80, CUTOFF_HZ, fs=SR, output="sos"), rounded)


dry = scene()
out = record(dry)
log_audio(out)
```